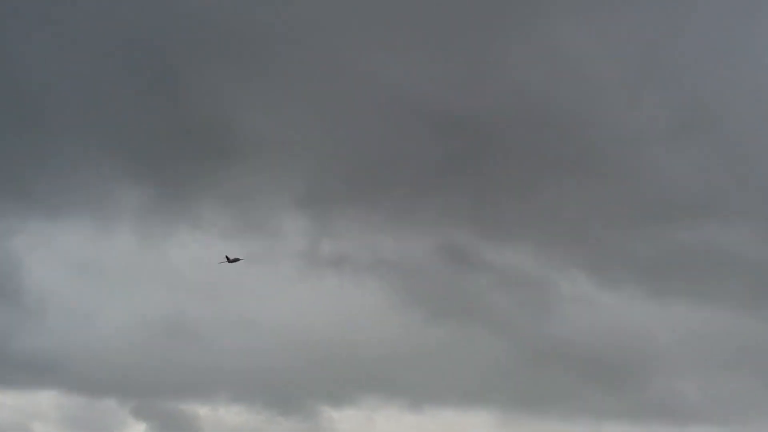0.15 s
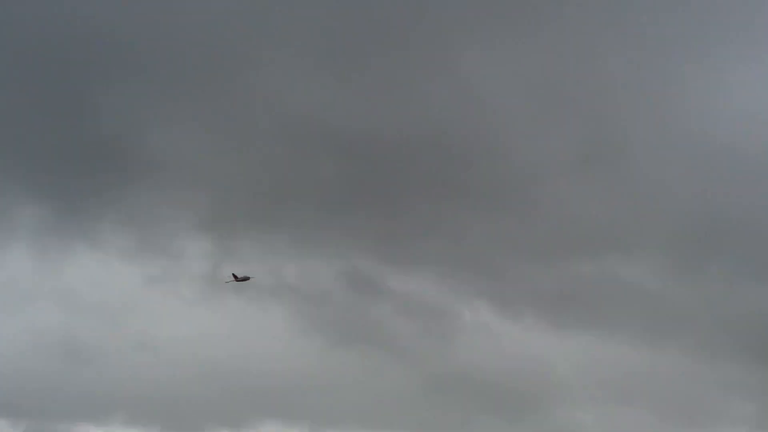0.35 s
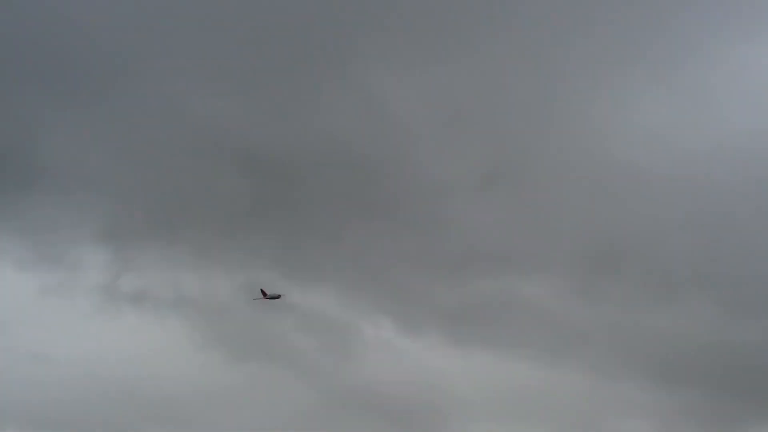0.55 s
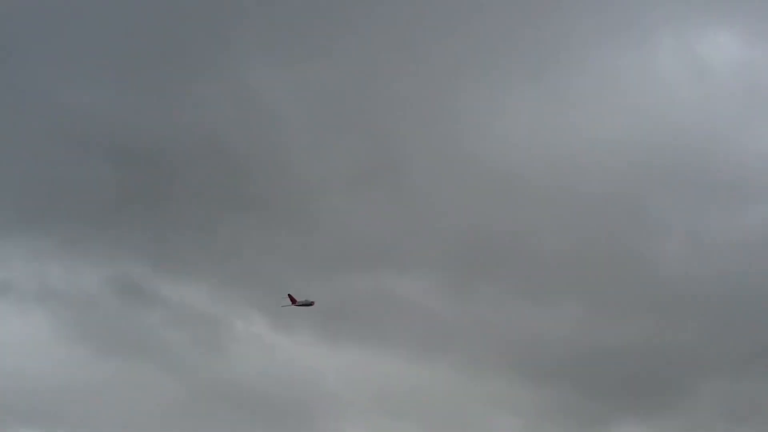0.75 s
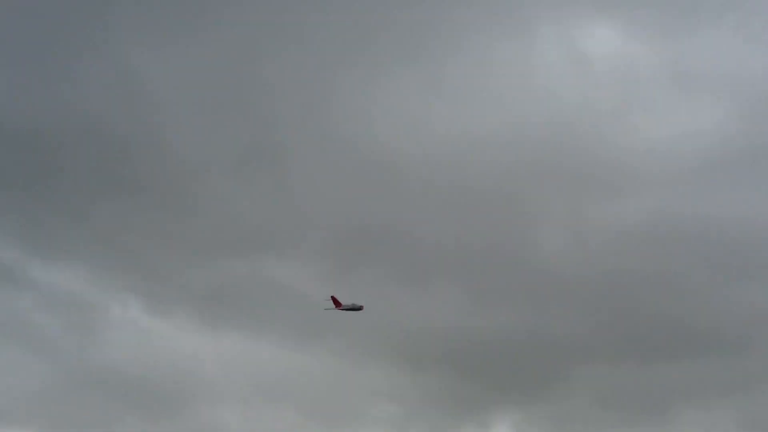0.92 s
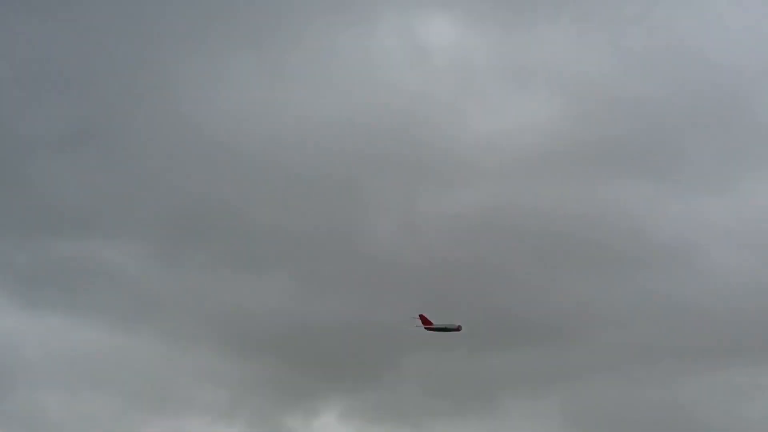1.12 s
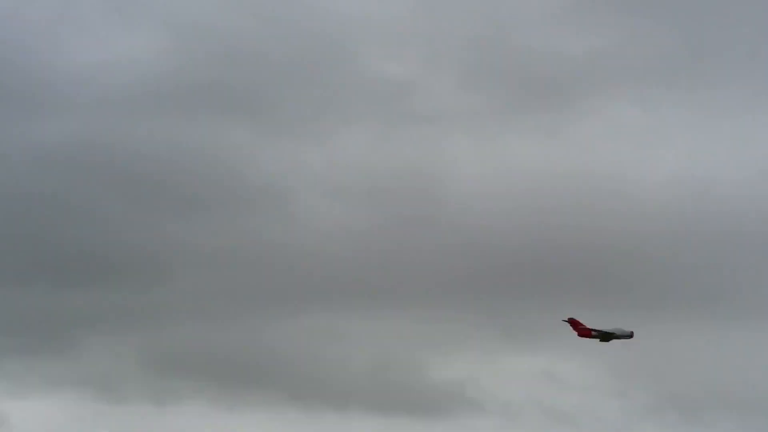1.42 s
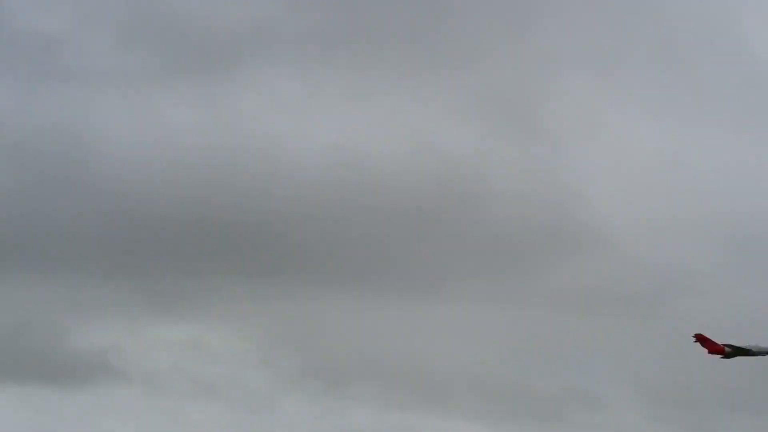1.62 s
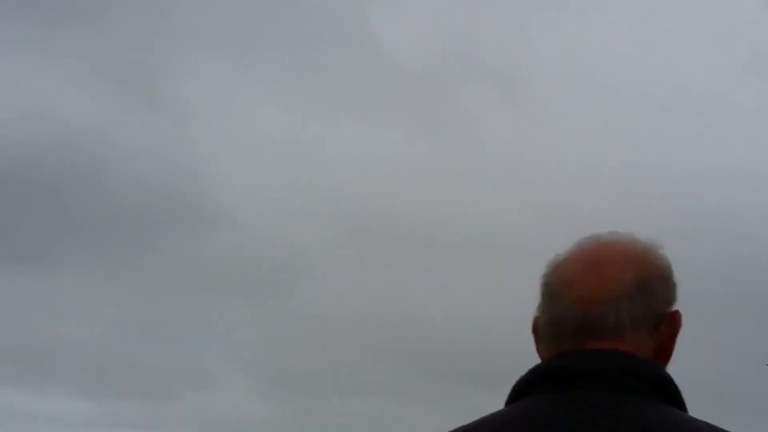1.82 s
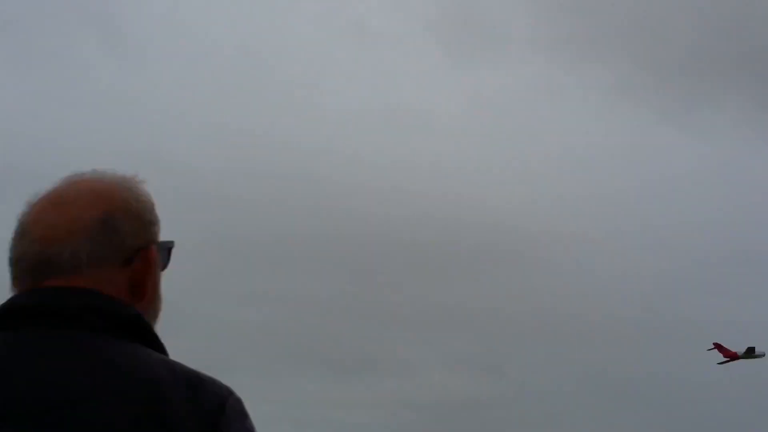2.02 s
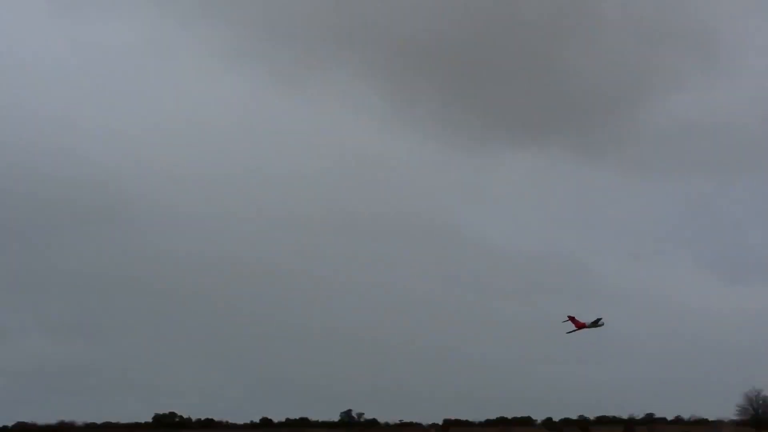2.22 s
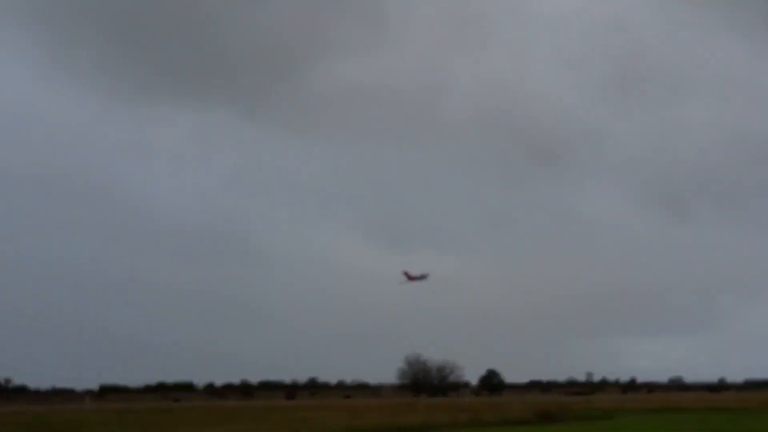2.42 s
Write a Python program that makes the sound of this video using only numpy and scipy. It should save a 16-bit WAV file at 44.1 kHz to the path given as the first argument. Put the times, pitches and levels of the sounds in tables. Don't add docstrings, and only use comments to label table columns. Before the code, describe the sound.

Thin high whine of a ducted-fan model jet passing low over a field, with wind thumping the microphone

```python
import sys
import numpy as np
from scipy import signal
from scipy.io import wavfile
from scipy.ndimage import map_coordinates

SR = 44100
rng = np.random.default_rng(int(sys.argv[2]) if len(sys.argv) > 2 else 0)


def ratio_of_db(decibels):
    return 10 ** (np.asarray(decibels, float) / 20)


def transcribe(u):
    v = np.clip(np.atleast_2d(u).T, -1, 1)
    q = np.round(v * 32767).astype(np.int16)
    wavfile.write(sys.argv[1], SR, q)


N = 112454
T = np.arange(N) / SR


def rms_one(x):
    return x / np.sqrt(np.mean(x ** 2) + 1e-20)


def in_time(rows):
    s, *columns = np.transpose(rows)
    return [np.interp(T, s, column) for column in columns]


def at_hz(points, hz):
    points_hz, db = np.transpose(points)
    return np.interp(np.log(hz), np.log(points_hz), db)


def drift(rate_hz):
    r = np.exp(-2 * np.pi * rate_hz / SR)
    return rms_one(signal.lfilter([1], [1, -2 * r, r * r], rng.standard_normal(N + SR))[SR:])


def sides(pan_db):
    return np.array([ratio_of_db(pan_db / 2), ratio_of_db(-pan_db / 2)]).reshape(2, -1)


def filtered(x, order, hz, kind):
    return signal.sosfilt(signal.butter(order, hz, kind, fs=SR, output="sos"), x)


def read_at(x, places):
    return np.array([map_coordinates(port, [places], order=3) for port in x])


# (multiple, tone column followed [index], level above it [dB],
# left minus right [dB], left phase lead [rad])
TONES = [
    (1, 0, 0.96, -3.5, 0.05),
    (2, 1, 1, 4, 0.66),
    (3, 2, -0.5, -4.5, -1.5),
    (4, 3, -7.6, -30, -1.5),
    (5, 4, 3.4, -10.5, 2.4),
    (6, 4, -8, 6, 2.4),
    (10, 4, -16.5, -6, 5.5),
]


def tones(turn, levels_db, lead):
    flutter_db = 0.51
    out = 0
    for k, column, db, pan_db, phase in TONES:
        half = (k * lead + phase) / 2
        wave = np.sin(k * turn + np.array([half, -half]) + rng.uniform(0, 2 * np.pi))
        flutter = flutter_db * np.sqrt(k) * (drift(8.8) + 0.88 * drift(65.0))
        level = ratio_of_db(levels_db[column] + db + flutter)
        out = out + np.sqrt(2) * level * sides(pan_db) * wave
    return out


# (multiple of blade tone, width [Hz], level above rush or roar [dB], left minus right [dB])
HUMPS = [
    (.66, 65, -20, -10),
    (1.39, 69, -0.5, -6.5),
    (1.735, 130, -6, -11),
    (2.375, 45, -17.5, -14),
    (2.72, 40, -10, 6),
    (3.38, 24, -6, 6),
    (4.39, 57, -8.5, -5.5),
]


def humps(turn, lead, rush_db, roar_db):
    howl_s, howl_length_s, howl_db = 1.8, 0.1005, 6.5
    howl_rise = 0.056
    out = 0
    for k, width_hz, db, pan_db in HUMPS:
        angle = k * (turn + np.array([lead, -lead]) / 2)
        source_db = roar_db if k < 3 else rush_db
        level = ratio_of_db(db + source_db) * sides(pan_db)
        if 1 < k < 1.5:
            level = level * ratio_of_db(howl_db * np.exp(-((T - howl_s) / howl_length_s) ** 2))
            angle = angle + howl_rise * np.cumsum(np.gradient(turn) * (T > howl_s - howl_length_s))
        out = out + level * (drift(width_hz) * np.cos(angle) + drift(width_hz) * np.sin(angle))
    return out


# (frequency [Hz], left minus right [dB])
SHADOW = [(600, 3.5), (1500, 14.5), (2700, 15), (3400, 3), (4300, -1.5), (6000, -6.5), (12000, -4)]


def turbulence(spectrum, lead_samples, patchy_db):
    alike_low, alike_fall_hz = 0.93, 9050
    edges = 400 * 2 ** (np.arange(17) / 3)
    white = rng.standard_normal((2, 2, N))
    out = 0
    for k, (low, high) in enumerate(zip(edges, edges[1:])):
        mid, side = filtered(white[k % 2], 2, [low, high], "band")
        hz = np.sqrt(low * high)
        alike = alike_low / (1 + (hz / alike_fall_hz) ** 2)
        patches = patchy_db * (drift(1.86) + drift(15.0))
        gain = ratio_of_db(at_hz(spectrum, hz) + patches) * sides(at_hz(SHADOW, hz))
        out = out + gain * (np.sqrt(1 + alike) * mid + np.sqrt(1 - alike) * side * [[1], [-1]])
    late = map_coordinates(out[1], [np.arange(N) - lead_samples], order=3, mode="nearest")
    return rms_one(np.array([out[0], late]))


# (frequency [Hz], level per Hz [dB])
INTAKE = [(500, -5.5), (1300, -7.5), (1900, -19.5), (3200, 2), (4800, -0.5), (7300, -13.5), (11000, -15),
          (15500, -20.5)]
# (frequency [Hz], level per Hz [dB])
EXHAUST = [(800, -10), (1500, -4.5), (2700, 1), (3600, -13), (6500, -68), (10500, -30), (15500, -37)]


def moving_air(lead_samples, rush_db, roar_db):
    intake = ratio_of_db(rush_db + 6) * turbulence(INTAKE, lead_samples, patchy_db=1.95)
    exhaust = ratio_of_db(roar_db + 2.5) * turbulence(EXHAUST, lead_samples, patchy_db=1.8)
    return intake + exhaust


def duct(air, blade_hz):
    delay_periods, gain = 2.93, 0.33
    late = np.arange(N) - delay_periods * SR / blade_hz
    again = np.array([map_coordinates(port, [late], order=3, mode="mirror") for port in air])
    return (air + gain * again) / np.hypot(1, gain)


# (time [s], delay [samples])
BODY_ECHO = [(0, 11.4), (.5, 12.1), (.95, 11.9), (1.35, 10.2), (1.6, 8.83), (2.55, 8.45)]


def body_echo(x):
    echo_hz, depth = 6100, 0.85
    rise_db_per_s, even_s = 2.5, 1.53
    delay, = in_time(BODY_ECHO)
    bright = signal.sosfiltfilt(signal.butter(2, echo_hz, "high", fs=SR, output="sos"), x)
    echo = depth * read_at(bright, np.arange(N) - delay)
    return x - bright + ratio_of_db(rise_db_per_s * (T - even_s)) * (bright + echo)


# (time [s], blade tone [Hz], its level [dB], second [dB], third [dB],
# fourth [dB], fifth tone [dB], intake rush [dB], exhaust roar [dB])
FAN = [(0, 1085, -40.5, -62.5, -58.5, -63, -63.5, -57.5, -58.5),
       (.15, 1081, -46, -57, -48.5, -65, -68.5, -55.5, -57.5),
       (.33, 1085, -50, -53.5, -56.5, -63, -66, -56.5, -58),
       (.5, 1082, -42.5, -48, -40.5, -61, -64, -56.5, -56),
       (.75, 1081, -39.5, -48.5, -47.5, -70, -62.5, -56, -52),
       (1.0, 1080, -33.5, -40, -39.5, -54, -57.5, -55.5, -51),
       (1.2, 1074, -32, -39.5, -34, -46, -52, -51, -47.5),
       (1.4, 1068, -27.5, -37, -40.5, -57, -50.5, -53.5, -49),
       (1.55, 1080, -27, -53, -48.5, -54, -51, -49.5, -46),
       (1.67, 1096, -32.5, -39, -43, -57, -62, -49, -44),
       (1.75, 1097, -43.5, -36.5, -37.5, -62, -53, -51, -52),
       (1.85, 1105, -38.5, -38, -48.5, -64, -72, -54.5, -56),
       (1.96, 1114, -38, -47, -43.5, -53, -55, -49.5, -46.5),
       (2.06, 1140, -37.5, -35, -46, -75, -64, -52, -44),
       (2.22, 1134, -43, -33.5, -60, -62, -66.5, -53.5, -47.5),
       (2.33, 1129, -46.5, -41.5, -50.5, -58, -70.5, -54.5, -50.5),
       (2.55, 1126, -50, -38, -52, -63, -65.5, -58, -50.5)]
# (time [s], lead of the left port [samples])
BEARING = [
    (0, 3),
    (1.5, -0.8),
    (1.95, -6),
    (2.55, 0),
]


def jet():
    wobble_hz = 2.112
    blade_hz, *levels_db, rush_db, roar_db = in_time(FAN)
    lead_samples, = in_time(BEARING)
    turn = np.cumsum(blade_hz + wobble_hz * drift(11.83)) * 2 * np.pi / SR
    lead = lead_samples * blade_hz * 2 * np.pi / SR
    air = duct(moving_air(lead_samples, rush_db, roar_db), blade_hz)
    return tones(turn, levels_db, lead) + humps(turn, lead, rush_db, roar_db) + body_echo(air)


def eddies(steady_db, gusts):
    eddy_hz, at_db, speedup = 246.7, -19.5, 0.3
    lump_db, evenness = 4.5, 0.43
    gust_db, tail = -4.5, 1.3
    level = ratio_of_db(steady_db + lump_db * drift(39.0))
    for s, db, ms in gusts:
        u = (T - s) / (ms / 2000) / np.where(T > s, tail, 1)
        level = level + ratio_of_db(db + gust_db) * np.exp(-u ** 2 / 2)
    tape = filtered(rng.standard_normal(2 * N), 2, [eddy_hz / 5.9, eddy_hz], "band")
    envelope = np.abs(signal.hilbert(tape)) + 0.013 * tape.std()
    tape = rms_one(tape / envelope ** evenness)
    tape = rms_one(filtered(tape, 4, 2.3 * eddy_hz, "low"))
    place = np.cumsum((level / ratio_of_db(at_db)) ** speedup)
    return level * np.interp(place, np.arange(2 * N), tape)


# (time [s], left port level [dB], right port level [dB])
WIND = [(0, -39.5, -49.5), (.12, -34.5, -48.5), (.28, -50, -49), (.4, -37, -39.5), (.7, -36.5, -43),
        (.95, -39, -47), (1.3, -37.5, -40), (1.65, -35.5, -36.5), (1.8, -46.5, -32.5), (1.97, -37.5, -23.5),
        (2.24, -43, -38), (2.32, -51.5, -48.5), (2.55, -52.5, -47.5)]
# (time [s], peak level [dB], length [ms])
LEFT_BUFFETS = [(0.188, -24, 9.7), (0.219, -17, 12.3), (0.362, -14, 19.2), (0.412, -20.5, 6.8),
                (0.563, -20, 6.7), (0.586, -23, 7.1), (0.621, -21, 13.6), (0.673, -25.5, 9.8),
                (0.718, -25, 12), (0.743, -18, 13), (1.056, -25, 13.7), (1.417, -28, 19.9),
                (1.504, -19, 4.8), (1.526, -16, 10.6), (1.605, -25.5, 10), (1.646, -14.5, 14),
                (1.668, -24, 6.7), (1.69, -22.5, 9.1), (1.916, -23, 7.3), (2.018, -19.5, 5.7),
                (2.117, -20, 10.6)]
# (time [s], peak level [dB], length [ms])
RIGHT_BUFFETS = [(1.361, -24, 5.47), (1.501, -21, 12.35), (1.613, -27, 6.93), (1.64, -18.5, 11.1),
                 (1.727, -20.5, 18.4), (1.746, -25.5, 5.7), (1.769, -19, 9.6), (1.79, -24, 10.7),
                 (1.806, -12.5, 10.84), (1.834, -9, 7.56), (1.857, -16.5, 7.3), (1.901, -15, 12.05),
                 (1.954, -12, 15.53), (1.996, -10, 6.2), (2.034, -9.5, 18.13), (2.067, -15, 11.8),
                 (2.121, -21, 8.84), (2.149, -18.5, 5.8), (2.179, -22, 8.1), (2.199, -25.5, 12),
                 (2.224, -8, 6.6), (2.244, -12, 5.8)]


def buffeting():
    left_db, right_db = in_time(WIND)
    rumble = np.array([eddies(left_db, LEFT_BUFFETS), eddies(right_db, RIGHT_BUFFETS)])
    return filtered(rumble, 4, 610, "low")


# (time [s], peak level [dB], pitch [Hz])
LEFT_SLAPS = [(.217, -8.5, 490), (.243, -30.5, 306), (.347, -21, 480), (.357, -22, 402), (.366, -18.5, 480),
              (.373, -20.5, 377), (.415, -29.5, 446), (.422, -32, 440), (.576, -47, 390),
              (.62, -26.5, 449.7), (.643, -24.5, 480), (.733, -30, 377), (.745, -21, 444), (.753, -17, 506),
              (.86, -29, 480), (1.644, -14, 480), (1.69, -30, 320), (2.102, -19, 438.1),
              (2.117, -22, 393.5)]
# (time [s], peak level [dB], pitch [Hz])
RIGHT_SLAPS = [(1.63, -18.5, 409.6), (1.639, -17.5, 440), (1.723, -19.5, 394), (1.736, -19.5, 394),
               (1.768, -23.5, 348), (1.803, -12.5, 426), (1.82, -11.5, 480), (1.834, -15.5, 400),
               (1.859, -13.5, 480), (1.884, -18.5, 426), (1.905, -15.5, 490), (1.918, -12, 449.6),
               (1.933, -14, 480), (1.946, -13, 480), (1.955, -11.5, 440), (1.983, -11, 395),
               (1.997, -3.5, 593), (2.008, -9, 670), (2.012, -9, 580), (2.035, -8.5, 560),
               (2.049, -16, 415), (2.068, -10.5, 470), (2.09, -25.5, 385.6), (2.121, -22, 410),
               (2.147, -25, 372), (2.166, -32.5, 380), (2.179, -24, 371.7), (2.223, -8.5, 516.2),
               (2.244, -25, 382.6)]


def slaps():
    cycles, sag = 0.62, 0.55
    push, push_slower = 0.47, 3.24
    reach = 400
    t = np.arange(-reach, reach) / SR
    out = np.zeros((2, N))
    for port, rows in enumerate((LEFT_SLAPS, RIGHT_SLAPS)):
        for s, db, hz in rows:
            phase = rng.random()
            bell = 1 / (1 + (t * hz / cycles) ** 2)
            turn = np.cumsum(hz * (1 - sag + 2 * sag * bell)) * 2 * np.pi / SR
            swing = np.sin(turn + 2 * np.pi * phase) * bell
            slow = t * hz / push_slower
            swing = swing + push * np.cos(2 * np.pi * (slow + phase)) * np.exp(-(2 * slow - 0.5) ** 2)
            peak = int(s * SR)
            out[port, peak - reach:peak + reach] += ratio_of_db(db) * swing * np.hanning(2 * reach)
    return out


# (time [s], length [s], first pitch [Hz], last pitch [Hz], level [dB])
WHISTLES = [(0.754, 0.036, 250, 395, -32.5), (0.793, 0.038, 400, 276, -30.5),
            (0.88, 0.043, 292.2, 410.6, -33), (0.901, 0.073, 395, 480, -25.5),
            (0.953, 0.037, 436.5, 629, -28.5), (0.986, 0.02, 507.4, 480, -27),
            (1.013, 0.071, 549, 309, -28), (1.068, 0.044, 323.7, 523, -23), (1.155, 0.071, 384, 409, -24),
            (1.203, 0.032, 416.4, 536, -24), (1.22, 0.04, 492, 518, -19.5),
            (1.273, 0.032, 486.3, 663, -31.5), (1.319, 0.013, 705, 725, -32),
            (1.331, 0.019, 279, 437, -23.5), (1.373, 0.02, 546.4, 630, -36),
            (1.427, 0.031, 568, 490, -19.5), (1.445, 0.03, 480, 478.5, -30.5),
            (1.505, 0.034, 200, 305, -25), (1.549, 0.022, 579, 715, -23), (1.562, 0.043, 504, 460, -35.5)]


def whistles():
    octave_db, octave_fade_hz = -10.5, 480
    waver = 1 + 0.0405 * drift(45.1)
    rough = ratio_of_db(3.5 * drift(85.2))
    out = np.zeros(N)
    for s, length, first_hz, last_hz, db in WHISTLES:
        u = np.clip((T - s) / length, 0, 1)
        turn = np.cumsum((first_hz + (last_hz - first_hz) * u) * waver) * 2 * np.pi / SR
        octave = ratio_of_db(octave_db) / (1 + (first_hz / octave_fade_hz) ** 6)
        swell = np.sin(np.pi * u) ** 0.75
        out += swell * np.sqrt(2) * ratio_of_db(db) * rough * (np.sin(turn) + octave * np.cos(2 * turn))
    return out * [[1], [0]]


def scene():
    return jet() + buffeting() + slaps() + whistles()


def low_pass(x):
    return signal.sosfilt(signal.butter(12, 15690, fs=SR, output="sos"), x)


def record(dry):
    x = filtered(dry, 2, 40.6, "high")
    return low_pass(0.84 * np.tanh(x / 0.97))


dry = scene()
out = record(dry)
transcribe(out)
```